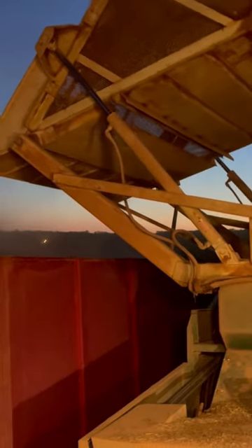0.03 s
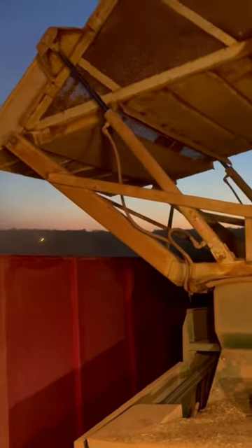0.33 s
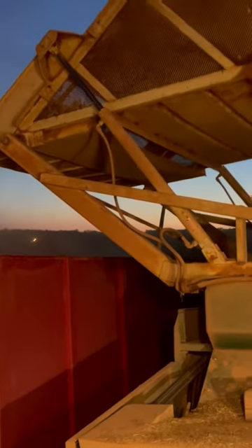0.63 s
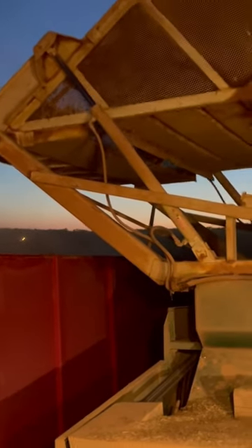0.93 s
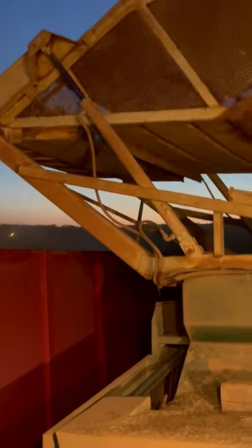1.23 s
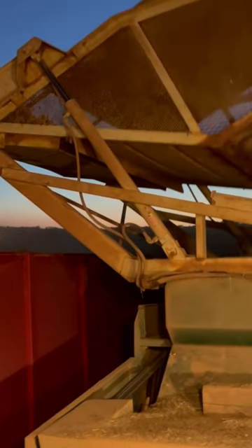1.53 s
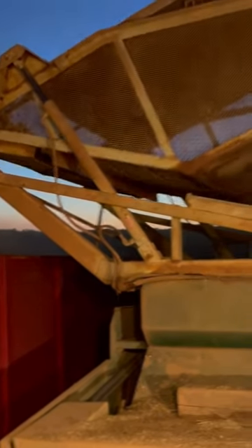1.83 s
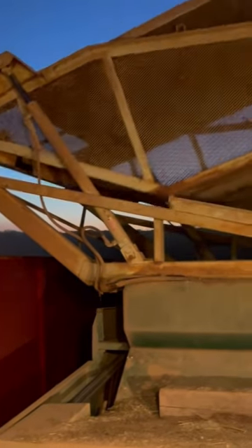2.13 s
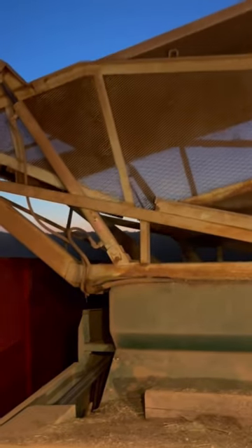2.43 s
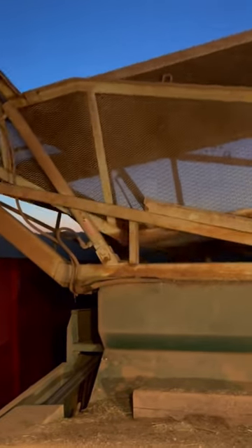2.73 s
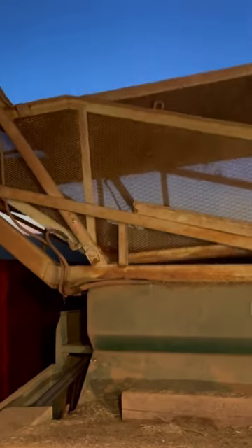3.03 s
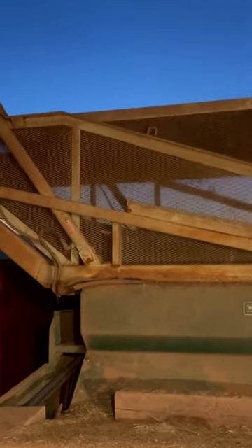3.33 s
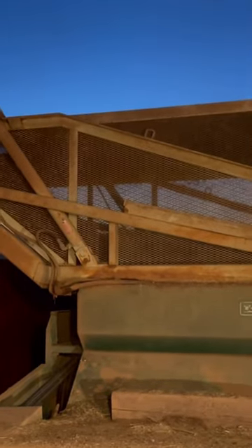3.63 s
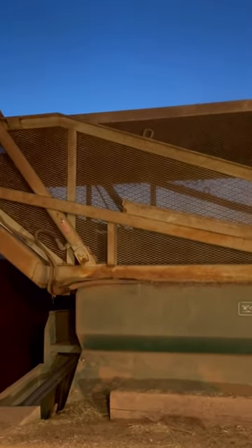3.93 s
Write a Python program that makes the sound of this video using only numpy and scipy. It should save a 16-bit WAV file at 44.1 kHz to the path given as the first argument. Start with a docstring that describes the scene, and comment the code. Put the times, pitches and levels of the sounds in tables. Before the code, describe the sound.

A harvester's steel basket clanks down and slams onto its frame over a running engine.

```python
"""A harvester's big steel mesh basket is lowered, close by, while the engine runs steadily.
For the first two seconds the basket jerks in its pivots: hollow clanks make the panels boom and
the wall flex. Then it glides quietly over the engine's hum and roar. At about 3.4 seconds it slams
onto the frame and bounces. The chassis thumps, loose panels shake and the wire mesh rattles out."""
import sys
import numpy as np
from scipy import signal
from scipy.fft import rfft, irfft
from scipy.io import wavfile
from scipy.ndimage import uniform_filter1d, minimum_filter1d

SR = 44100
rng = np.random.default_rng(int(sys.argv[2]) if len(sys.argv) > 2 else 0)


def wrap_up_sound(samples):
    """Save the sound to the file named by the first command line argument, as 16-bit audio."""
    columns = np.atleast_2d(samples).T
    # keep every value between -1 and 1, then stretch to whole-number steps
    tamed = np.clip(columns, -1, 1)
    steps = np.round(tamed * 32767).astype(np.int16)
    wavfile.write(sys.argv[1], SR, steps)


N = 176400  # 4 seconds
SHAFT_HZ = 28.2  # engine turns per second
LANDING_S = 3.354  # the basket first touches the frame

# Stereo width of the basket, narrow because its sound arrives directly: pitch_hz, side_level_db
BASKET_SPREAD = [(60, -13), (250, -38), (600, -17), (1300, -12.5), (2800, -6.5), (6000, -27), (9000, -13.5)]


def landing_slam():
    """The basket hits the frame and bounces, in a quick run of heavy blows."""
    # Each blow: start_s, boom_db, clang_db, crack_db, rise_s, clang_pitch_hz
    hits = [(3.354, -36, -41, -45, .001, 1500), (3.365, -25, -19.5, -21, 0.002, 1300),
            (3.372, -8.5, -16, -17.5, 0.00087, 800), (3.389, -11.5, -28, -21.5, .002, 700),
            (3.431, -14, -24.5, -27, .001, 700), (3.449, -6.5, -15, -19, 0.0048, 326),
            (3.501, -12.5, -19.5, -34, 0.0027, 330), (3.529, -16, -33, -29, .001, 700),
            (3.548, -10, -19, -40, 0.0057, 620), (3.917, -24, -31, -50, .001, 745)]
    # Tone of the deep boom: pitch_hz, level_db
    boom_colour = [(25, -44), (50, -10), (90, 2), (125, -3.5), (190, -6.5), (250, -2.5), (350, -17),
                   (550, -31), (1000, -35)]
    # Tone of the hollow clang: pitch_hz, level_db
    clang_colour = [(120, -20), (260, 3), (480, -4.5), (700, 1), (850, -4), (1050, -18), (1350, -32),
                    (1800, -5.5), (2300, -34), (2800, -29), (5000, -27)]
    return steel_blows(hits, boom_colour, clang_colour, boom_fade_s=0.4)


def pivot_clanks():
    """The basket jerks in its pivots, and each knock leaves the panels booming."""
    # Each clank: start_s, boom_db, clang_db, crack_db, rise_s, clang_pitch_hz
    hits = [(0.002, -21, -20.5, -36, 0.004, 300), (0.037, -21, -19, -25, 0.001, 694),
            (0.100, -23.5, -18, -35, .006, 345), (0.143, -20, -22, -34.5, 0.0027, 377),
            (0.197, -34, -22.5, -35.5, .0014, 1300), (0.251, -22.5, -20.5, -26, 0.0071, 1210),
            (0.328, -39, -15.5, -23, 0.0017, 1150), (0.451, -23, -15, -20, 0.00049, 1200),
            (0.564, -48, -15.5, -18.5, 0.00035, 1200), (0.648, -24, -21, -57, 0.0027, 553),
            (0.745, -26.5, -17.5, -37, .001, 600), (0.913, -26.5, -17, -33.5, 0.0011, 625),
            (1.472, -31, -15.5, -30.5, 0.0017, 930), (1.489, -21.5, -17, -24.5, 0.00094, 660),
            (1.628, -25, -14.5, -27.5, 0.011, 990), (1.757, -28, -15.5, -30, 0.0033, 1010),
            (1.992, -43, -33, -59, .0015, 870)]
    # Tone of the long boom: pitch_hz, level_db
    boom_colour = [(38, -18), (54, -4), (95, 2.5), (140, 1), (220, 2.5), (330, 1), (500, -9), (1000, -51)]
    # Tone of the hollow clang: pitch_hz, level_db
    clang_colour = [(120, -29), (260, -3), (480, -1.5), (620, 3), (780, -4.5), (980, -3.5), (1300, -10),
                    (1800, -12.5), (2250, -17), (2800, -25.5), (5000, -39)]
    return steel_blows(hits, boom_colour, clang_colour, boom_fade_s=1.3)


def steel_blows(hits, boom_colour, clang_colour, boom_fade_s):
    """Steel hits steel: the contact cracks, the frame clangs and rings, and the panels boom."""
    # Ringing notes of the basket frame: pitch_hz, level_db, fade_s
    frame_notes = [(198.2, 0, 1.5), (252.7, 0.5, 0.37), (285, 2, 0.88), (349, -17, 0.22), (440, -7, 0.87),
                   (542, -1, .6), (592, -5.5, 0.77), (665.5, -8.5, 1.7), (871, -10, 0.95), (990, -2, 0.15),
                   (1102, -11.5, 0.93), (1270, -25, 0.51), (1465, -1, 0.14), (995, -11, 0.6),
                   (1362, -13, 0.43), (1894, -22, 0.5)]
    # Short, bright notes where the steel is struck: pitch_hz, level_db, fade_s
    contact_notes = [(2220, 3.5, 0.044), (3164, -5, 0.07), (3510, -8, 0.073), (3900, -9, 0.04),
                     (4130, -5.5, 0.056), (4973, -6.5, 0.057), (5244, -7, 0.054), (6220, -20, 0.074)]
    # Tone of the crack: pitch_hz, level_db
    crack_colour = [(700, 14), (1600, 6.5), (2700, 2), (3800, -1.5), (4500, -2.5), (5100, -4.5), (6000, -5),
                    (7400, -6.5), (8700, -1.5), (10000, -5.5), (12500, -23)]
    out, t = np.zeros((2, N)), np.arange(36000) / SR
    snap = 1 + undb(1.5) * np.exp(-t / 0.0011)  # the first instant of contact is the loudest
    boom_swell = 1 - np.exp(-t / 0.0019)
    clang_swell = 1 - np.exp(-t / 0.00046)  # the sheet takes a moment to start ringing
    end_fade = np.minimum(1, 2 * (1 - t / t[-1])) ** 2
    for start_s, boom_db, clang_db, crack_db, rise_s, clang_pitch_hz in hits:
        boom = sheet_metal(boom_colour, t, boom_fade_s, middle_hz=100) * boom_swell
        clang = sheet_metal(clang_colour, t, fade_s=0.55, middle_hz=1460)
        clang += undb(-10) * ring(frame_notes, t)
        clang = strike_spot(clang, clang_pitch_hz) * clang_swell * end_fade
        crack = sheet_metal(crack_colour, t, fade_s=0.21, middle_hz=2000)
        crack += undb(-7) * ring(contact_notes, t)
        blow = undb(boom_db) * boom + undb(clang_db) * clang + undb(crack_db) * crack * snap
        add(out, blow * np.minimum(t / rise_s, 1), start_s)
    return out


def sheet_metal(colour, t, fade_s, middle_hz):
    """A sheet's countless notes blur into noise. Of three bands, the middle drops 60 dB in fade_s."""
    hz = np.fft.rfftfreq(len(t), 1 / SR)
    spectrum = rfft(tint(noise(len(t), BASKET_SPREAD), colour))
    bands_hz = [middle_hz / 2, middle_hz, middle_hz * 2]
    out = np.zeros((2, len(t)))
    for band_hz, share in zip(bands_hz, np.eye(3)):
        band = irfft(spectrum * read_curve(list(zip(bands_hz, share)), hz), len(t))
        fade_speed = (band_hz / middle_hz) ** 0.15  # higher notes die sooner
        out += band * undb(-60 * fade_speed * t / fade_s)
    return out


def ring(notes, t):
    """A struck part rings a little differently each time. Each note drops 60 dB in its fade_s."""
    hz, db, fade_s = np.array(notes).T[:, :, None]
    strength, detune, phase, ear_offset = rng.standard_normal((4, len(hz), 1))
    level = undb(db + 4.03 * strength - 60 * t / fade_s)
    angle = 2 * np.pi * (hz * (1 + 0.00286 * detune) * t + phase)
    return np.array([(level * np.sin(angle + ear * 0.28 * ear_offset)).sum(0) for ear in (-1, 1)])


def strike_spot(x, pitch_hz, lift_db=5.5, reach_octaves=0.59):
    """Where the steel is struck decides which octave of its sound stands out."""
    octaves_away = np.log2((np.fft.rfftfreq(x.shape[-1], 1 / SR) + 1) / pitch_hz)
    nearness = np.exp(-(octaves_away / reach_octaves) ** 2)
    return irfft(rfft(x) * undb(lift_db * (nearness - 0.5)), x.shape[-1])


def chassis_thumps():
    """The chassis thumps as it takes the basket's weight, and again on each bounce."""
    # Each thump: start_s, level_db
    thumps = [(3.367, -14.5), (3.446, -10.5), (3.503, -20), (3.544, -14), (3.562, -12)]
    # Low notes of the chassis: pitch_hz, level_db, fade_s
    notes = [(56, -3, 0.2), (86.8, -2.5, 0.16), (109, -13, 0.18), (169.3, 4.5, 0.12), (224, -3, 0.15),
             (295, 2.5, 0.11)]
    out, t = np.zeros((2, N)), np.arange(SR) / SR
    swell = 1 - np.exp(-t / 0.013)
    for start_s, level_db in thumps:
        add(out, undb(level_db) * ring(notes, t) * swell, start_s)
    return out


def wall_flexes(sag_s=0.036, swell_s=0.013):
    """The metal wall buckles under the shifting load: a hollow note swells and sags as it relaxes."""
    # Each flex: start_s, level_db, pitch_ratio
    flexes = [(0.002, -23.5, 1.14), (0.055, -17.5, 1.2), (0.745, -26, 0.97), (0.914, -22.5, 1.1),
              (1.489, -15, 1.01)]
    # Hollow notes of the wall: pitch_hz, level_db, fade_s
    notes = [(258.4, 3.5, 0.26), (385, 0, 0.33), (450, 2.5, 0.17), (528, -8.5, 0.21), (660, 4.5, 0.12)]
    out, t = np.zeros((2, N)), np.arange(SR) / SR
    clock = t + 0.026 * sag_s * (1 - np.exp(-t / sag_s))  # the pitch starts 2.6% high
    swell = 1 - np.exp(-t / swell_s)
    for start_s, level_db, pitch_ratio in flexes:
        add(out, undb(level_db) * ring(notes, clock * pitch_ratio) * swell, start_s)
    return out


def mesh_rattle(ticks_per_s=1100, hold_s=0.034, fall_db_per_s=75, linger_db=-21.5):
    """After the landing the wire mesh chatters against its frame, dies down and lingers faintly."""
    # Tone of the chatter: pitch_hz, level_db
    colour = [(400, 10), (800, 0), (1700, -4), (2800, -10), (4000, -11.5), (6500, -15.5), (7500, -8.5),
              (8600, -7), (9500, -7), (10500, -6.5), (12500, -27)]
    age_s = np.arange(N) / SR - LANDING_S
    ticks = (rng.random((2, N)) < ticks_per_s / SR) * rng.choice([-1, 1], (2, N))
    smear = rng.standard_normal(400) * np.exp(-np.arange(400) / 90)
    smear = irfft(np.exp(1j * np.angle(rfft(smear))))  # lengthens a tick but keeps its tone
    chatter = signal.fftconvolve(spread(*ticks, BASKET_SPREAD), smear[None])[:, :N]
    chatter = mesh_ring(tint(chatter, colour))
    shake = undb(-fall_db_per_s * np.maximum(age_s - hold_s, 0)) + undb(linger_db)
    bursts = undb(2 * wander(120))
    fade_in = np.clip(age_s / 0.01, 0, 1)
    return undb(-18) * chatter * shake * bursts * fade_in


def mesh_ring(x, width_hz=13):
    """The mesh and its struts ring along, lifting a few narrow pitches in the sound."""
    # Pitches at which they ring: pitch_hz, lift_db
    peaks = [(748, 7), (1384, 6), (1640, 7), (1880, 6), (2136, 6), (2478, 6), (2642, 7), (2735, 9),
             (3605, 6), (5169, 7), (8222, 3), (8683, 3), (8787, 4), (9224, 4)]
    hz = np.fft.rfftfreq(x.shape[-1], 1 / SR)
    lift = 1 + sum((undb(db) - 1) / (1 + 2j * (hz - peak_hz) / width_hz) for peak_hz, db in peaks)
    return unit(irfft(rfft(x) * lift, x.shape[-1]))


def loose_panels(peak_s=3.567, fall_db_per_s=53, linger_db=-14):
    """The loose side panels shake hardest on the bounce, then keep trembling on the frame."""
    # Tone of the shaking: pitch_hz, level_db
    colour = [(170, -16), (300, 5.5), (420, 0.5), (520, -2), (700, 2.5), (850, -8.5), (1100, -8),
              (2000, -18.5)]
    t = np.arange(N) / SR
    shake = undb(-fall_db_per_s * np.abs(t - peak_s)) + undb(linger_db)
    fade_in = np.clip((t - LANDING_S) / 0.019, 0, 1)
    return undb(-18) * tint(noise(N, BASKET_SPREAD), colour) * shake * fade_in


def panel_shudder():
    """The broad panels rumble as the basket sways, and drone at twice the engine's turning rate."""
    # Tone of the rumble: pitch_hz, level_db
    colour = [(40, -37), (55, -2), (72, 0), (100, 3), (150, -3.5), (205, -1.5), (300, -8.5), (450, -13),
              (900, -20.5), (2000, -47)]
    # Loudness of the rumble: time_s, level_db
    rumble_levels = [(0, -23.5), (.9, -24), (1.25, -24.5), (1.5, -33), (1.8, -21.5), (2.03, -24),
                     (2.17, -35.5), (3.35, -32.5), (3.6, -21.5), (4, -18)]
    # Loudness of the drone: time_s, level_db
    drone_levels = [(0, -47), (1.0, -41), (1.25, -20), (1.6, -37), (2.0, -23), (2.2, -35), (4, -39)]
    rumble = tint(noise(N, BASKET_SPREAD), colour)
    drone_hz = 2 * SHAFT_HZ * (1 + 0.03 * wander(8.15))
    drone = np.sin(2 * np.pi * np.cumsum(drone_hz) / SR)
    return rumble * gain_over_time(rumble_levels) + drone * gain_over_time(drone_levels)


def engine(firings_per_turn=3, roar_db=-25):
    """Shaft tones waver over a roar that throbs unevenly with the firings and knocks once a turn."""
    # Hum of the engine and its drive: pitch_hz, level_db
    tones = [(27.6, -42), (56.4, -48), (112.5, -36.5), (143, -33.5), (150.7, -33), (199, -44), (323, -38),
             (474, -47.5), (667.5, -47), (942, -52), (968, -47.5), (1130, -49.5)]
    # Tone of the roar: pitch_hz, level_db
    colour = [(38, -30), (60, -2.5), (85, -11), (150, -2.5), (180, -7.5), (245, -8), (277, -11.5),
              (330, -7), (420, -13.5), (570, -23), (650, -19), (860, -24.5), (950, -20.5), (1030, -27),
              (1110, -24), (1660, -34), (2280, -34), (3100, -40.5), (4200, -41.5), (5850, -46), (7400, -48),
              (8800, -42), (10200, -42.5), (11700, -56), (13000, -75)]
    # Stereo width, wide because the engine's sound arrives from all round: pitch_hz, side_level_db
    width = [(60, -10), (250, -14.5), (600, -5), (1300, -0.5), (2800, -1.5), (6000, -21), (9000, -17)]
    clock = np.arange(N) / SR + 0.0036 * np.cumsum(wander(4)) / SR  # the speed drifts slightly
    hum = np.zeros(N)
    for pitch_hz, level_db in tones:
        level = np.sqrt(2) * undb(level_db + 1.5 * wander(6.87))
        hum += level * np.sin(2 * np.pi * (pitch_hz * clock + rng.random()))
    shaft_angle = 2 * np.pi * SHAFT_HZ * clock
    roar = tint(noise(N, width), colour)
    clatter = signal.sosfiltfilt(signal.butter(2, [700, 3200], "band", fs=SR, output="sos"), roar)
    firing = 1 + 0.047 * np.cos(firings_per_turn * shaft_angle)
    throb = (roar - clatter) * firing * undb(1.5 * wander(18))
    knock = clatter * (1 + 0.27 * np.cos(shaft_angle)) * undb(-wander(21.2))
    return hum + undb(roar_db) * (throb + knock)


def undb(db):
    """Turn decibels into a number to multiply by."""
    return 10 ** (np.asarray(db) / 20)


def unit(x):
    """Scale a signal to an average (rms) level of 1."""
    return x / np.sqrt(np.mean(x ** 2))


def read_curve(points, hz):
    """Read between (pitch_hz, value) points, with octaves evenly spaced."""
    pitches, values = np.array(points).T
    return np.interp(np.log(hz + 1e-3), np.log(pitches), values)


def gain_over_time(points):
    """Join (time_s, level_db) points into a gain for every sample."""
    return undb(np.interp(np.arange(N) / SR, *np.array(points).T))


def tint(x, colour):
    """Shape a sound's tone with a curve, falling away past its ends; the result has level 1."""
    hz = np.fft.rfftfreq(x.shape[-1], 1 / SR) + 1e-3
    ends = np.minimum(1, np.minimum(hz / colour[0][0], colour[-1][0] / hz)) ** 2
    return unit(irfft(rfft(x) * undb(read_curve(colour, hz)) * ends, x.shape[-1]))


def spread(mid, side, width):
    """Make left and right: both share mid, and side sets them apart as far as width allows."""
    hz = np.fft.rfftfreq(len(mid), 1 / SR)
    side = irfft(rfft(side) * undb(read_curve(width, hz)), len(mid))
    return np.array([mid + side, mid - side])


def noise(size, width):
    """Stereo hiss."""
    return spread(*rng.standard_normal((2, size)), width)


def wander(changes_per_s):
    """A smooth random drift around zero, about 1 in size."""
    hold = int(SR / changes_per_s)
    steps = np.repeat(rng.standard_normal(N // hold + 1), hold)
    return unit(uniform_filter1d(uniform_filter1d(steps, hold), hold)[:N])


def add(out, x, start_s):
    """Mix a sound in at its start time."""
    i = int(start_s * SR)
    out[:, i:i + x.shape[1]] += x[:, :N - i]


def scene():
    """The basket clanks down and lands while the engine runs."""
    descent = panel_shudder() + wall_flexes() + pivot_clanks()
    landing = landing_slam() + chassis_thumps() + mesh_rattle() + loose_panels()
    return descent + landing + engine()


def record(dry, ceiling=0.92, limiter_s=0.004, top_hz=13000):
    """Two close microphone openings hear slightly unlike tones; peaks are held and the top is cut."""
    # How much louder the left side is: pitch_hz, level_db
    balance = [(60, -1), (130, 0.4), (260, -1.7), (550, 2.3), (1000, 0.9), (2000, -0.8), (4000, -3.5),
               (8500, -1)]
    # How far the left side's wave runs ahead: pitch_hz, lead_radians
    left_lead = [(100, 0.088), (300, -0.22), (600, 0.67), (1900, 0.34), (2500, -0.79), (4500, -0.86),
                 (5500, -1.47), (6800, -1.14), (7600, -1.53), (8900, 0.77), (10000, 3.1), (11500, 1.4)]
    # A dip in the microphone's treble: pitch_hz, level_db
    mic_colour = [(9600, 0), (10000, 2), (10250, -43), (10700, -7), (11300, 2), (12200, -4), (13000, -21)]
    hz = np.fft.rfftfreq(2 * N, 1 / SR)
    lean = undb(read_curve(balance, hz) / 2) * np.exp(0.5j * read_curve(left_lead, hz))
    spectrum = rfft(dry, 2 * N) * undb(read_curve(mic_colour, hz))
    heard = irfft(spectrum * np.array([lean, 1 / lean]))[:, :N]
    window = int(limiter_s * SR)
    gain = ceiling / np.maximum(np.abs(heard).max(0), ceiling)  # turns down only the peaks
    gain = uniform_filter1d(minimum_filter1d(gain, window), window)
    treble_cut = signal.ellip(8, 0.2, 70, top_hz, fs=SR, output="sos")
    return signal.sosfilt(treble_cut, heard * gain)


dry = scene()
out = record(dry)
wrap_up_sound(out)
```